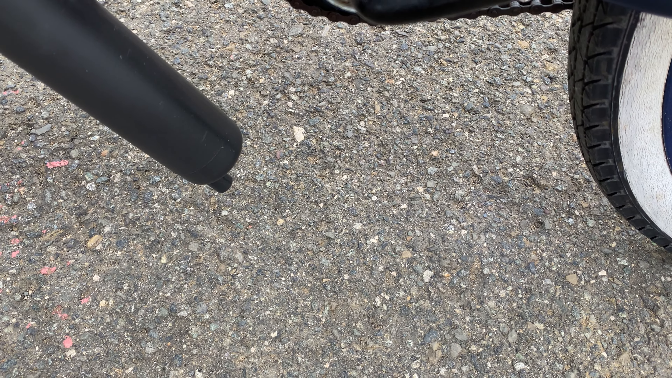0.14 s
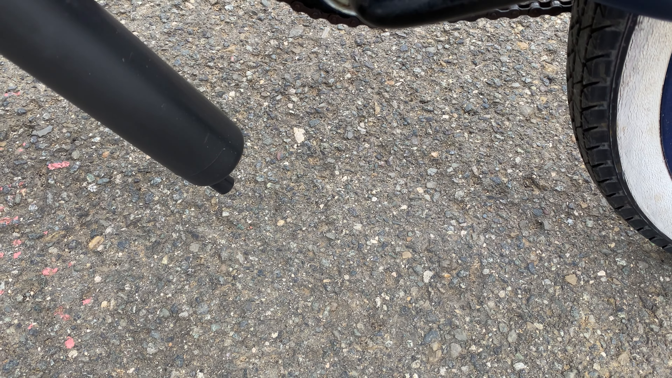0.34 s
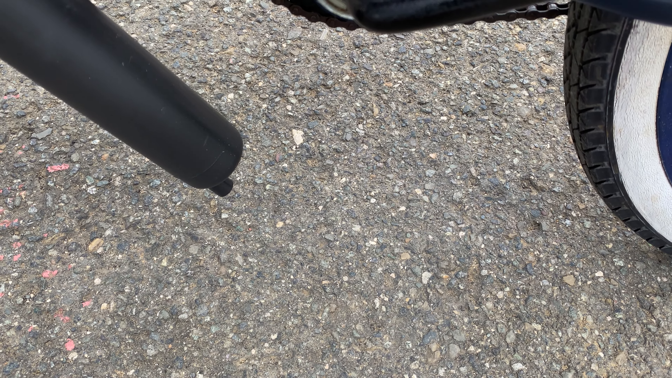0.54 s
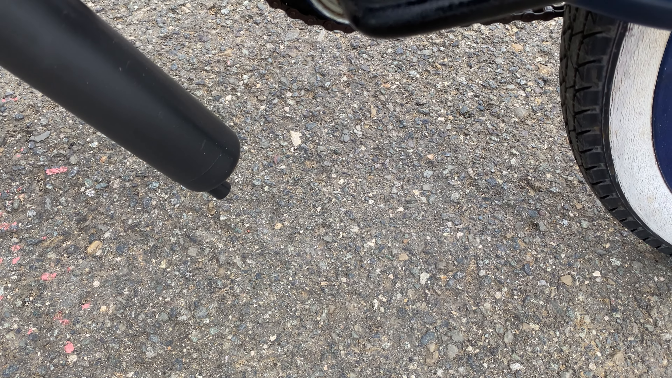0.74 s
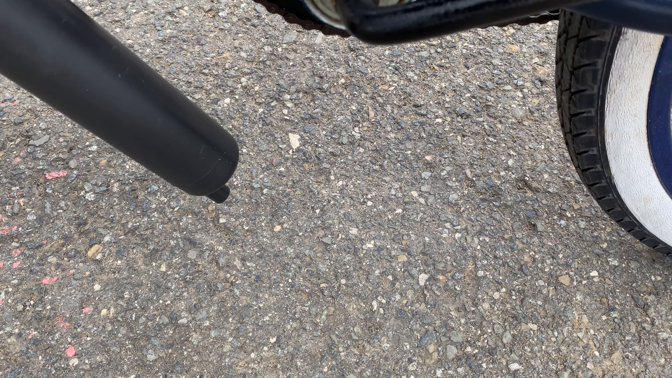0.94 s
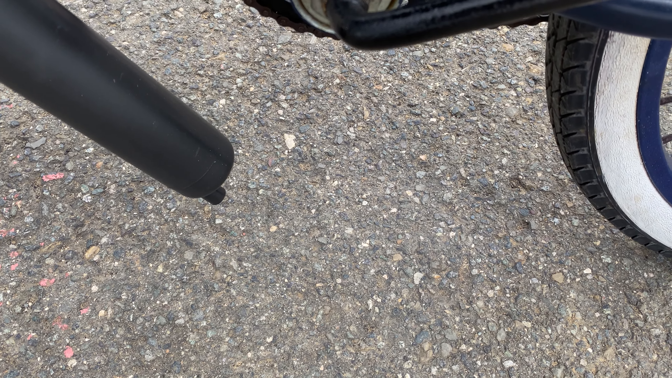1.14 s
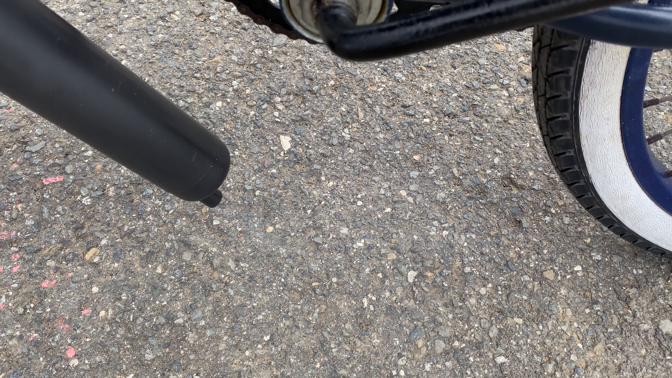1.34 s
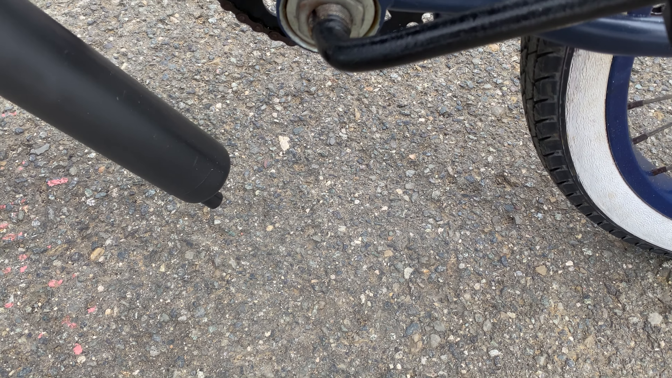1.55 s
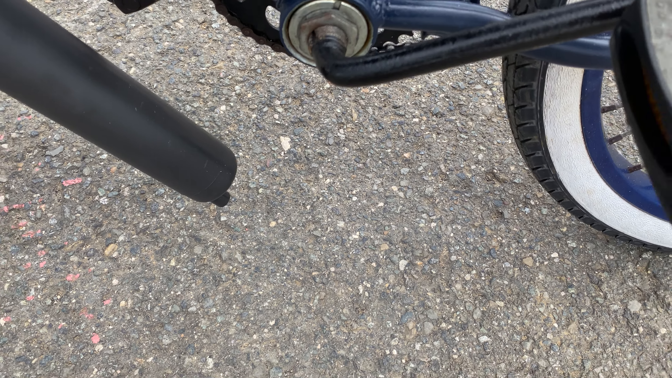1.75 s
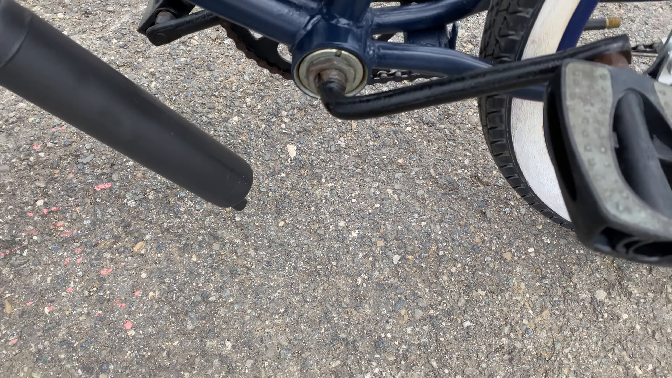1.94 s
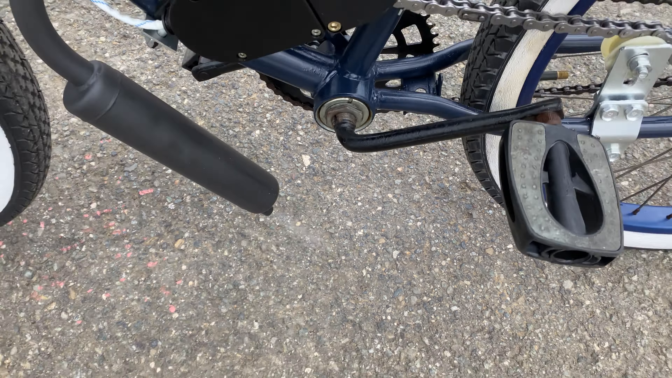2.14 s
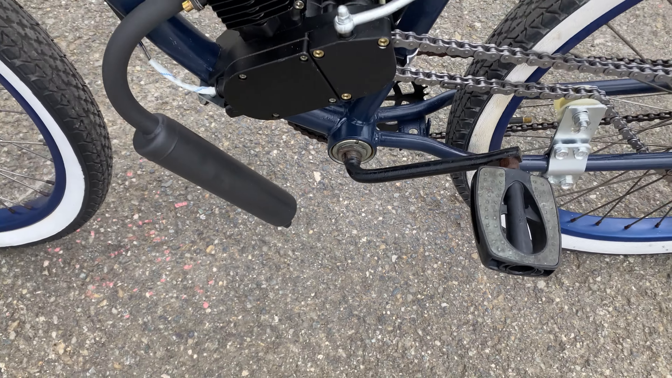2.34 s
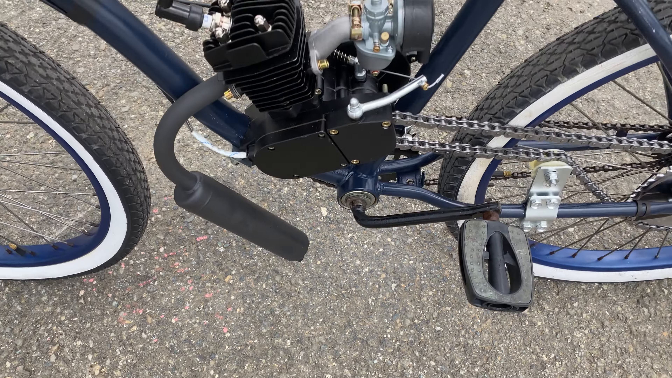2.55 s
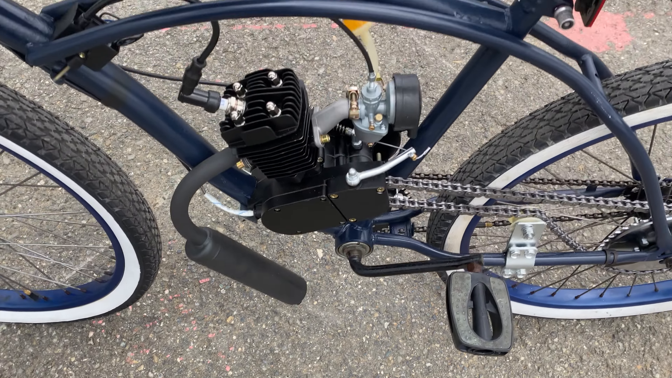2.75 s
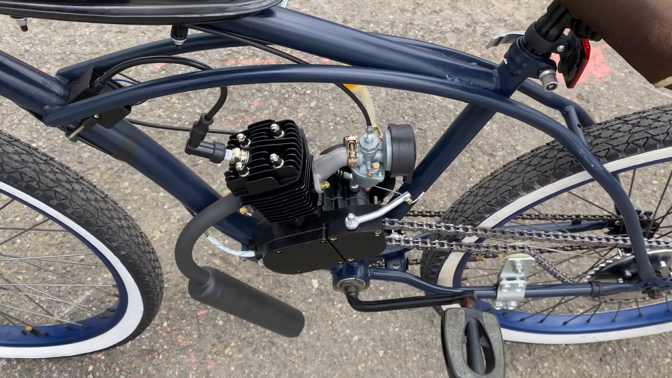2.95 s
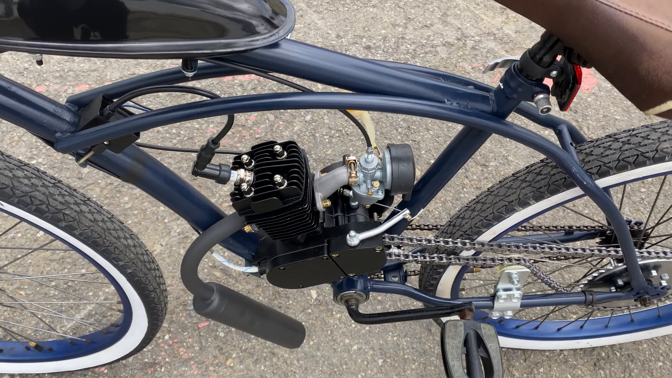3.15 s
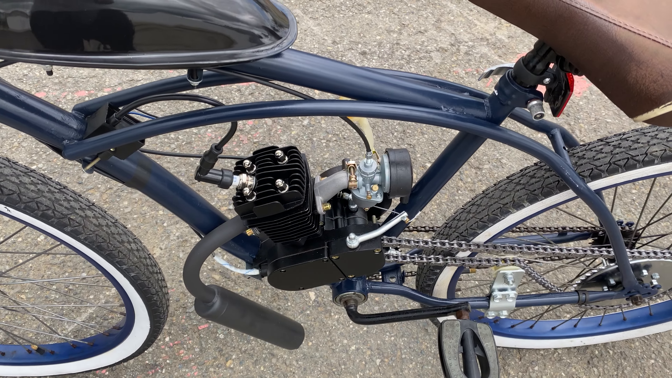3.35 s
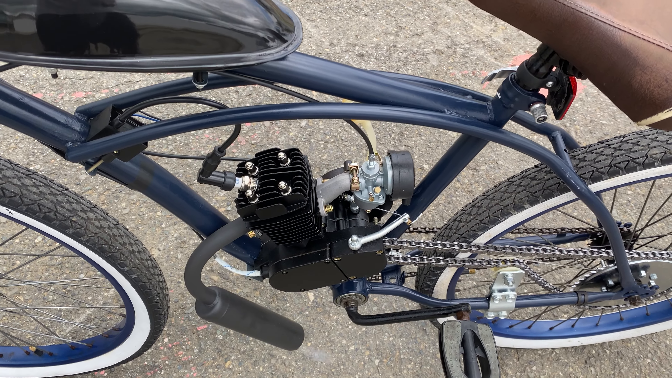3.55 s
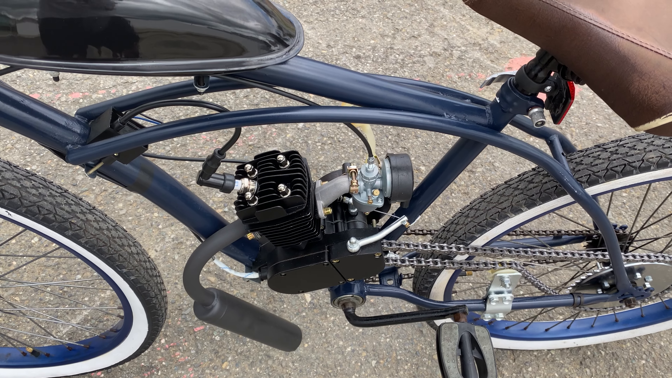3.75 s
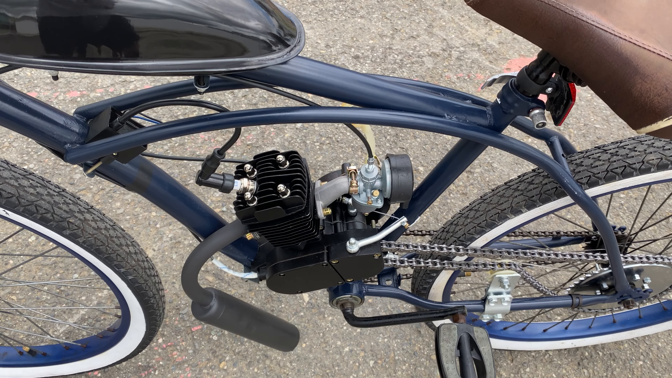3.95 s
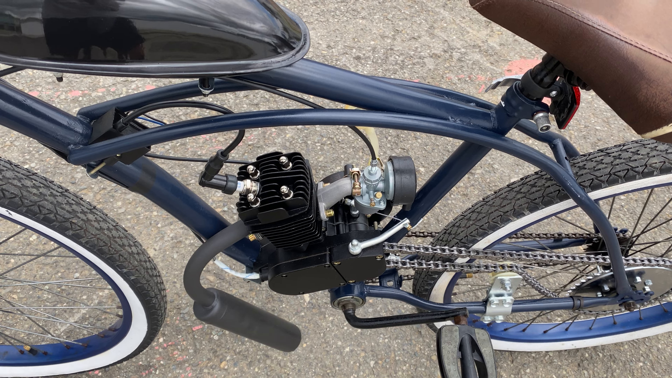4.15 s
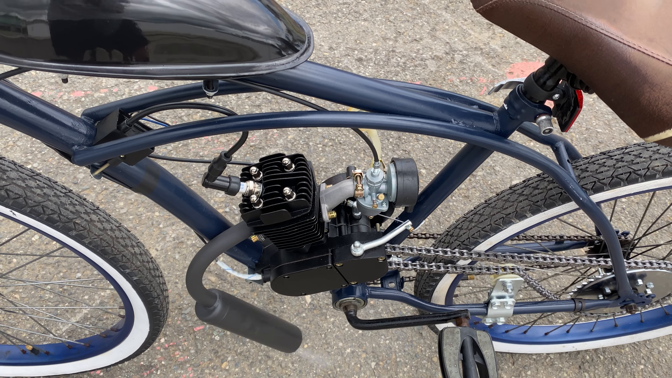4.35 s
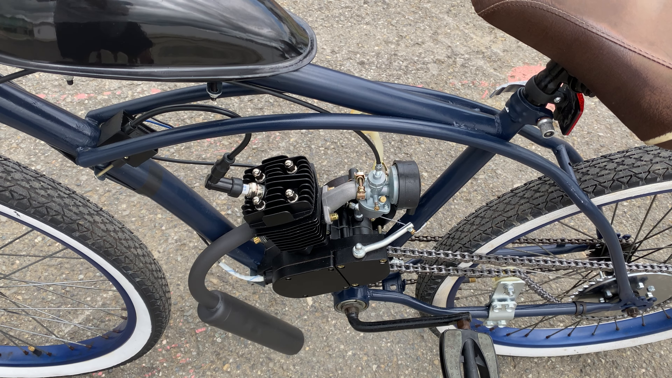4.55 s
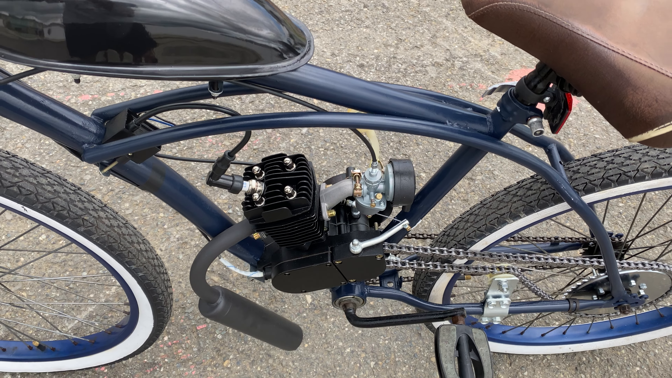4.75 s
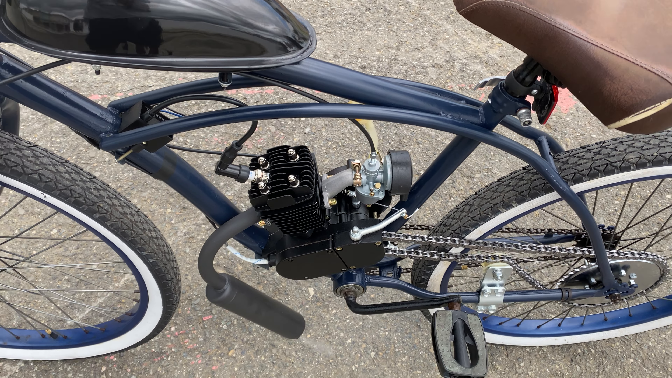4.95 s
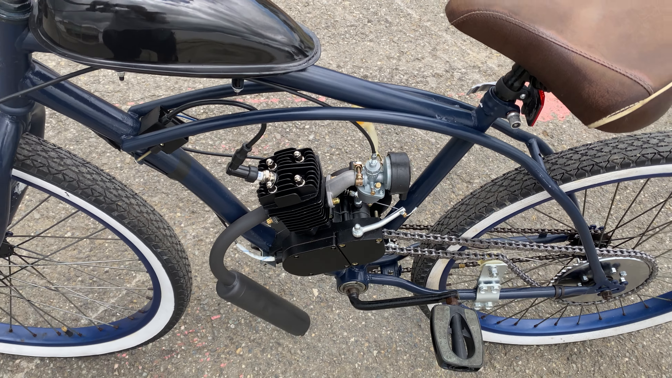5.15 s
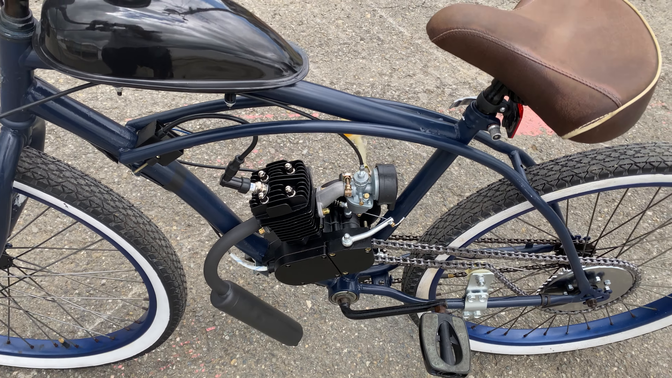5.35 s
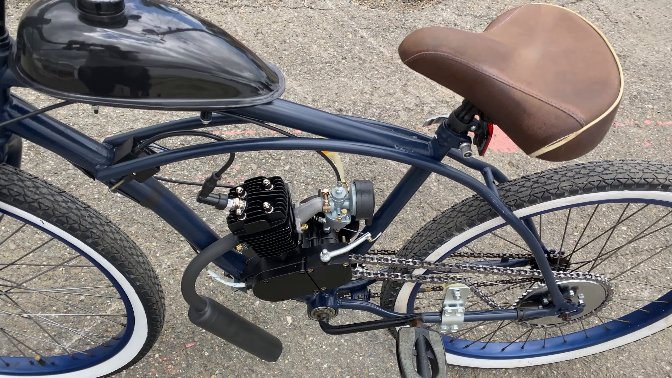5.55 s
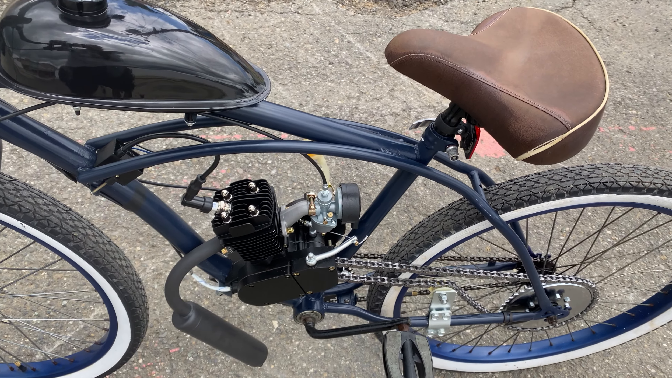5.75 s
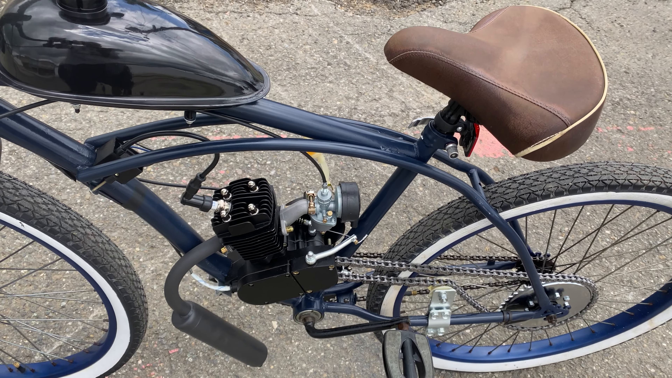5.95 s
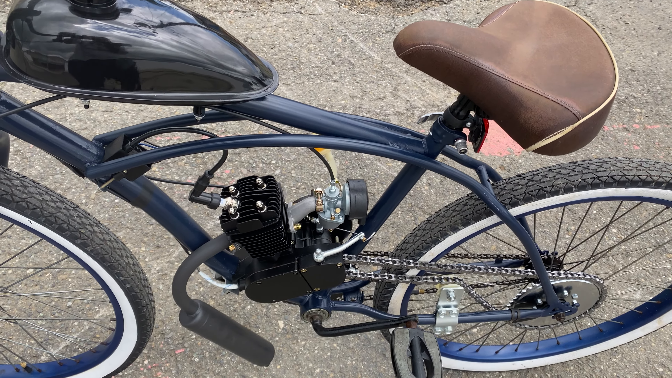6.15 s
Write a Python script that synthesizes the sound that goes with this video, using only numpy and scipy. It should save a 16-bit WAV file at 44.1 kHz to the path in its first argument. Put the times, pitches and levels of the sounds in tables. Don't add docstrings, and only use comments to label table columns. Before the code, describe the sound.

A small two-stroke bicycle motor idles unevenly outdoors, sputtering pops and puffs close at its exhaust, then drawing back to thinner metallic clatter.

```python
import sys
import numpy as np
from scipy import signal
from scipy.fft import rfft, irfft
from scipy.io import wavfile
from scipy.ndimage import uniform_filter1d

SR = 44100
rng = np.random.default_rng(int(sys.argv[2]) if len(sys.argv) > 2 else 0)


def to_wav(sig):
    pcm = np.clip(np.atleast_2d(sig), -1, 1) * 32767
    pcm = np.round(pcm).astype(np.int16)
    wavfile.write(sys.argv[1], SR, pcm.T)


def gain_from_decibels(decibels):
    exponent = np.asarray(decibels, float) / 20
    return 10 ** exponent


N = 273420
TIME = np.arange(N) / SR

# start_s, nearness to the tail pipe (0-1), distance_gain_db, frame_shake_db
PHONE_PATH = [(0, 1.0, 1.2, -.4), (.35, 1, -0.5, 1), (.62, 0.98, 0.5, 2), (1.2, 0.95, 1.4, 1),
              (1.55, 0.97, 1.5, 0), (1.86, 0.92, 1.4, 4), (2.2, 0.76, 0.7, 0.8), (2.5, 0.41, 0.3, 1),
              (2.8, 0.26, 1.2, 0.5), (3.2, 0.23, 0, -1.5), (3.72, 0.24, .4, -1), (4.34, 0.14, 1.9, 0),
              (4.7, 0.2, .4, -4), (4.96, 0.08, .6, 5), (5.27, 0.15, -1.5, 1.5), (5.7, 0.17, -0.2, -2),
              (6.2, 0.13, -0.5, 2.6)]
# start_s, peak_db, ring_hz, frame_ring_db
LOOSE_TICKS = [(0.636, -13, 5200, -43), (2.05, -15, 5260, -27), (2.118, -17, 5780, -30),
               (2.2594, -22, 5820, -36), (2.2946, -16, 5400, -41), (2.359, -11, 5690, -26),
               (2.3818, -5, 6330, -29), (2.4199, -15, 5920, -31), (2.4433, -14, 5870, -43),
               (2.812, -10, 5460, -36), (2.9974, -24, 5530, -36), (4.1963, -11, 5520, -51),
               (4.291, -12, 5800, -48), (4.5276, -7, 5840, -44), (4.7981, -7.5, 5840, -36),
               (5.0415, -8, 5860, -37), (5.7488, -9, 5900, -33), (5.906, -11, 5520, -37)]
# ring_hz, width_hz, near_db, far_db
METAL_RINGS = [(1064, 59, -11.5, -16), (1369, 69, -3, -3.5), (1478, 100, -4.5, -5), (1776, 66, -9, -2.5),
               (2530, 300, -6.5, -52), (3116, 100, -14, -8.5), (3326, 52, -22, -13.5), (4174, 22, -6, -10),
               (4530, 103, -11, -26), (5520, 86, -17, -8), (5860, 134, -33, -6.5)]
# centre_hz, cylinder_near_db, cylinder_far_db, hiss_near_db, hiss_far_db
TONE_COLOUR = [(420, 4, -31, -46, -50), (686, -19, -13.5, -30, -24), (1730, -8.5, -10, -11, -21),
               (2630, -13.5, -15.5, -0.5, -23), (3900, -34, -17.5, 10.5, 0.5), (6070, -19, -29, -0.5, 0.5),
               (7900, -36, -60, 8, -8), (9500, -13, -17, 4, 10), (9470, -20, -37, 2, 5.5),
               (11330, -27, -34, 0, -7.5), (12250, -37, -35, -33, -9), (14200, -46, -49, -20, -36),
               (15600, -50, -53, -36, -60)]
# centre_hz, likeness (0-1), left_minus_right_db, left_lead_rad
PORT_PAIR = [(60, 0.74, 0.5, -0.41), (340, 1, 5, -0.57), (706, 0.55, 1, -1.52), (1510, 0.65, 3, 0.98),
             (2830, 0.46, -2, -1.5), (8000, 0.45, -2.5, -1.37)]
# centre_hz, left_lead_rad
TREBLE_PHASE = [(8150, -3.9), (8450, -3.2), (8900, -3.08), (10400, -.6), (11300, 0.), (12100, .6),
                (12900, 2.7), (13700, 3.14), (14500, 3.4), (15100, 6.), (15900, 6.6)]
# centre_hz, level_db
STREET_COLOUR = [(25, -20), (60, 0), (90, 0), (200, -5), (400, -7), (550, -24), (900, -40)]
# start_s, crank_turns_per_firing
FIRING_RHYTHM = [(.0088, 3), (.0952, 3), (.3766, 3), (.8191, 3), (1.4447, 2), (1.568, 3), (1.8676, 3),
                 (2.0562, 3), (2.2336, 1), (2.3161, 2), (2.374, 3), (2.4573, 2), (2.6433, 3), (2.7386, 3),
                 (3.2773, 3), (3.5381, 3), (3.8148, 3), (4.0846, 2), (4.2129, 3), (4.308, 4), (4.4299, 3),
                 (4.9672, 2), (5.0305, 3), (5.1279, 3), (5.492, 2), (5.5554, 3), (5.8301, 2), (6.023, 3),
                 (6.1218, 3)]
# start_s, knock_db, pop_db
UNEVEN_CHARGES = [(.095, -18, 0.3), (.819, -7, 0.5), (.912, 4, -1.2), (.998, -8, 0.5), (1.507, 3.5, 1.5),
                  (1.568, -3, -5.5), (1.766, -6, 0), (1.962, -10, -1), (2.146, 7, -1.5), (2.234, -4, 0.2),
                  (2.374, 12.5, 2.1), (2.457, -12, 0), (2.643, 8, 1.2), (2.739, 0, -0.2), (3.009, 4, -0.5),
                  (3.364, -13, -0.2), (3.453, 0, -1), (3.719, 0, -1.5), (4.308, 6.5, 0.1), (4.609, 9, 0.8),
                  (4.877, 5.5, 1), (5.128, 2.5, -.6), (5.492, -7, -2.5), (5.83, -4, .4), (6.023, 11, 1.4),
                  (6.122, 5.5, .8)]

TURN_S, INTAKE_LAG_S = 0.0305, 0.0055
FRAME_HZ, PIPE_MOUTH_HZ = 4197, 430


def unit(x):
    return x / np.sqrt(np.mean(x ** 2))


def play(times, sizes, grain):
    spikes = np.zeros(N)
    at = np.round(times * SR).astype(int)
    inside = (at >= 0) & (at < N)
    spikes[at[inside]] = sizes[inside]
    return signal.fftconvolve(spikes, grain)[:N]


def colour(x, hz, db):
    f = np.maximum(np.fft.rfftfreq(N, 1 / SR), 1)
    return irfft(rfft(x) * gain_from_decibels(np.interp(np.log(f), np.log(hz), db)), N)


def ring(x, hz, width_hz):
    return signal.lfilter(*signal.iirpeak(hz, hz / width_hz, fs=SR), x)


def walk(rate_hz):
    hold = int(SR / rate_hz)
    levels = np.repeat(rng.standard_normal(N // hold + 1), hold)
    return 1.31 * uniform_filter1d(levels, hold)[:N]


def hump(angle, centre, width):
    return np.exp((np.cos(2 * np.pi * (angle - centre)) - 1) / width)


def breeze(level_db):
    band = signal.butter(2, [45, 110], "band", fs=SR, output="sos")
    gusts = signal.sosfilt(band, rng.standard_normal((2, N)))
    return unit(gusts) * gain_from_decibels(level_db - 8)


def street_rumble(near):
    rumble = colour(rng.standard_normal((2, N)), *np.transpose(STREET_COLOUR))
    return unit(rumble) * gain_from_decibels(-39 + 4 * near)


def ticks():
    t = np.arange(4000) / SR
    out = np.zeros((2, N + len(t)))
    for s, peak_db, hz, frame_db in LOOSE_TICKS:
        crack = rng.standard_normal((2, len(t))) * np.exp(-t / 0.0093)
        bright = ring(ring(crack, 9000, 6000), 9000, 6000)
        burst = 0.37 * bright + 3 * ring(crack, hz, 910) + 0.92 * ring(crack, 2000, 900)
        shiver = 5.2 * ring(rng.standard_normal(len(t)), FRAME_HZ, 90)
        frame = (np.sin(2 * np.pi * FRAME_HZ * t) + shiver) * np.exp(-t / 0.029)
        out[:, int(s * SR):][:, :len(t)] += gain_from_decibels(peak_db - 10.5) * burst + gain_from_decibels(frame_db + 2.5) * frame
    return out[:, :N]


def firings(pop_far_db=-10, pop_rise_db=5, knock_far_db=-27.5, knock_rise_db=8.5):
    start, stride = np.transpose(FIRING_RHYTHM)
    count = np.round(np.diff(start) / (stride[:-1] * TURN_S)).astype(int)
    first = np.concatenate([[0], np.cumsum(count)])
    s = np.interp(np.arange(count.sum() + 1), first, start)
    rest = np.concatenate([stride[:1], np.repeat(stride[:-1], count)]) - 3
    near = np.clip(np.interp(s, *np.transpose(PHONE_PATH)[:2]), 0, 1)
    chance = rng.standard_normal((2, len(s)))
    pop_db = pop_far_db + pop_rise_db * near ** 2 + 1.2 * rest - 0.5 * chance[0]
    knock_db = knock_far_db + knock_rise_db * near + 8 * rest - 0.6 * chance[1]
    at, odd_knock_db, odd_pop_db = np.transpose(UNEVEN_CHARGES)
    odd = np.abs(s - at[:, None]).argmin(axis=1)
    pop_db[odd] += odd_pop_db
    knock_db[odd] += odd_knock_db
    return s, pop_db, knock_db


def crank(fired_s):
    fired = fired_s + INTAKE_LAG_S
    fired = np.concatenate([[fired[0] - 3 * TURN_S], fired, [fired[-1] + 3 * TURN_S]])
    count = np.concatenate([[0], np.cumsum(np.round(np.diff(fired) / TURN_S))])
    turns = np.arange(count[-1] + 1)
    dead = ~np.isin(turns, count[1:-1])
    shut = np.interp(turns, count, fired) + 0.00067 * dead * rng.standard_normal(len(turns))
    return shut, dead, np.interp(TIME, shut, turns)


def intake(lit, angle, near, level_db):
    s, pop_db, _ = lit
    t = np.arange(500) / SR
    spit_db = pop_db - 27 + rng.standard_normal(len(s))
    spit = play(s - 0.0068, gain_from_decibels(spit_db), (t / 0.0018) * np.exp(1 - t / 0.0019))
    draw = gain_from_decibels(level_db - 2.5 + 2.4 * walk(30)) * hump(angle, 0.22, 0.16)
    leak = gain_from_decibels(level_db - 9 + 2.0 * walk(40))
    noise = gain_from_decibels(0.59 * walk(700)) * rng.standard_normal((2, N))
    air = (leak + (0.32 + 0.5 * near) * draw + spit) * noise
    throat = ring(ring(near * draw * noise, 4750, 1040), 4830, 1100) * gain_from_decibels(14.5)
    throat = throat + ring(spit * noise, 4703, 89) * gain_from_decibels(19.0)
    hz, _, _, near_db, far_db = np.transpose(TONE_COLOUR)
    hiss = near * colour(air, hz, near_db) + (1 - near) * colour(air, hz, far_db)
    return gain_from_decibels(8.5) * (hiss + throat)


def cylinder(lit, shut, angle, near, level_db):
    slap_db = -3 + 1.87 * rng.standard_normal(len(shut))
    turn = np.minimum(angle.astype(int) + 1, len(shut) - 1)
    slap = gain_from_decibels(slap_db[turn]) * hump(angle, 0.47, 0.3)
    half_turn = 0.29 * gain_from_decibels(2.8 * walk(33)) * hump(2 * angle, 0.45, 0.39)
    s, _, knock_db = lit
    t = np.arange(1200) / SR
    blow = (1 - np.exp(-t / 0.0016)) * np.exp(-(t / 0.015) ** 2)
    knock = play(s - 0.0152, gain_from_decibels(knock_db - 3.0), blow)
    force = knock + gain_from_decibels(level_db - 0.5) * (0.8 + slap + half_turn)
    grit = gain_from_decibels(1.4 * walk(900) + 1.55 * walk(260))
    rattle = force * grit * rng.standard_normal((2, N))
    hz, cylinder_near_db, cylinder_far_db, _, _ = np.transpose(TONE_COLOUR)
    body = near * colour(rattle, hz, cylinder_near_db) + (1 - near) * colour(rattle, hz, cylinder_far_db)
    for ring_hz, width_hz, near_db, far_db in METAL_RINGS:
        struck = rattle * gain_from_decibels(1.6 * walk(120) + 1.8 * walk(5))
        body = body + gain_from_decibels(far_db + near * (near_db - far_db)) * ring(struck, ring_hz, width_hz)
    return gain_from_decibels(16) * signal.sosfilt(signal.butter(4, 490, "high", fs=SR, output="sos"), body)


def throb(angle, level_db):
    wobble_turns = 0.045 * walk(14)
    hum = np.cos(4 * np.pi * (angle + 0.0022 + wobble_turns))
    return hum * gain_from_decibels(level_db + 0.5 + 0.6 * walk(15))


def silencer(start_hz, end_hz, glide_s, swell_s, sharp):
    t = np.arange(int(0.04 * SR)) / SR
    cycles = end_hz * t + (start_hz - end_hz) * glide_s * (1 - np.exp(-t / glide_s))
    swell = (t / swell_s * np.exp(1 - t / swell_s)) ** sharp
    return swell * np.cos(2 * np.pi * cycles)


def puffs_and_gulps(shut, dead, near, level_db):
    scatter = rng.standard_normal((2, len(shut)))
    puff = silencer(149.3, 104.0, 0.028, 0.0094, 9.2)
    puffs = play(shut - 0.0135, dead * gain_from_decibels(8.5 + 2.8 * scatter[0]), puff)
    t = np.arange(800) / SR
    gulp = (t / 0.00061) * np.exp(1 - t / 0.0006)
    gulp += 0.5 * (1 - np.exp(-t / 0.00058)) * np.exp(-t / 0.012)
    gulp += 0.86 * np.exp(-t / 0.0021) * np.sin(2 * np.pi * 700 * t)
    gulps = play(shut - 0.0005, gain_from_decibels(2.0 + 0.91 * scatter[1]), gulp)
    gulps = gulps + near * 1.34 * ring(gulps + 0.25 * puffs, PIPE_MOUTH_HZ, 74)
    return gain_from_decibels(level_db) * (puffs + gulps)


def exhaust_pops(lit, near, puff_db):
    s, pop_db, _ = lit
    pops = play(s - 0.0057, gain_from_decibels(pop_db - 1.37), silencer(389.4, 95.6, 0.0051, 0.0044, 1.58))
    scatter = rng.standard_normal((2, len(s)))
    late_s = s + 0.01947 + 0.0019 * scatter[0]
    late_db = pop_db - 13.5 + 2.3 * scatter[1]
    pops = pops + play(late_s, gain_from_decibels(late_db), silencer(352, 175, 0.006, 0.0061, 3.2))
    churn = ring(ring(rng.standard_normal(N), 260, 206), 277, 195) * gain_from_decibels(2.5 * walk(35))
    pops = pops + unit(churn) * gain_from_decibels(puff_db - 12.5 + 2.9 * near)
    return pops + near * 0.093 * ring(pops, PIPE_MOUTH_HZ, 110)


def ports(pair):
    f = np.fft.rfftfreq(N, 1 / SR)
    hz, *columns = np.transpose(PORT_PAIR)
    like, balance_db, lead = (np.interp(f, hz, c) for c in columns)
    top = f > TREBLE_PHASE[0][0]
    like[top], balance_db[top] = 0.996, 0
    lead[top] = np.interp(f[top], *np.transpose(TREBLE_PHASE))
    like = np.clip(like, 0, 1)
    left, own = rfft(pair)
    right = like * left * np.exp(-1j * lead) + np.sqrt(1 - like ** 2) * own
    return irfft([left * gain_from_decibels(balance_db / 2), right * gain_from_decibels(-balance_db / 2)], N)


def scene():
    path_s, *columns = np.transpose(PHONE_PATH)
    near, gain_db, shake_db = (np.interp(TIME, path_s, c) for c in columns)
    near = np.clip(near, 0, 1)
    throb_db = -30.5 + 8 * near + shake_db
    puff_db = -27.5 + 7.5 * near
    cylinder_db = -29 + 1.9 * near + gain_db
    hiss_db = -36.5 + 2 * near + gain_db

    lit = firings()
    shut, dead, angle = crank(lit[0])
    around = street_rumble(near) + ticks()
    motor = intake(lit, angle, near, hiss_db) + cylinder(lit, shut, angle, near, cylinder_db)
    gas = throb(angle, throb_db) + puffs_and_gulps(shut, dead, near, puff_db)
    gas = gas + exhaust_pops(lit, near, puff_db)
    return ports(gas * [[1], [0]] + around + motor) + breeze(throb_db)


def top_cut(x):
    return signal.sosfilt(signal.butter(12, 15960, fs=SR, output="sos"), x)


def record(dry):
    heard = signal.sosfilt(signal.butter(3, 44, "high", fs=SR, output="sos"), dry)
    heard = np.tanh(heard * 1.1) / 1.1
    heard = signal.sosfilt(signal.ellip(10, 0.3, 80, 15750, fs=SR, output="sos"), heard)
    return top_cut(heard)


dry = scene()
out = record(dry)
to_wav(out)
```